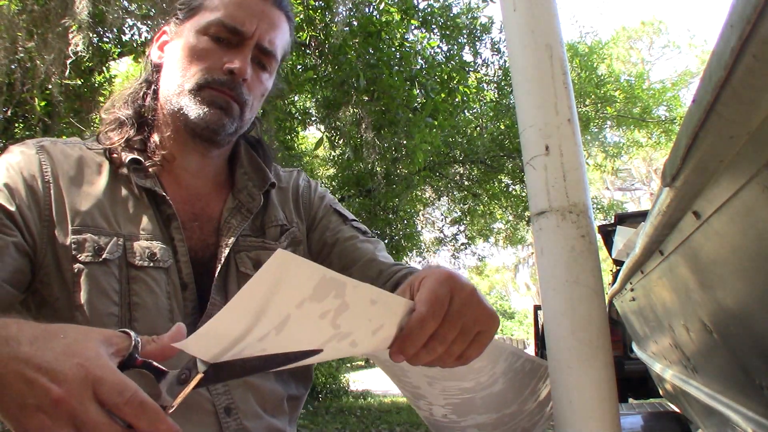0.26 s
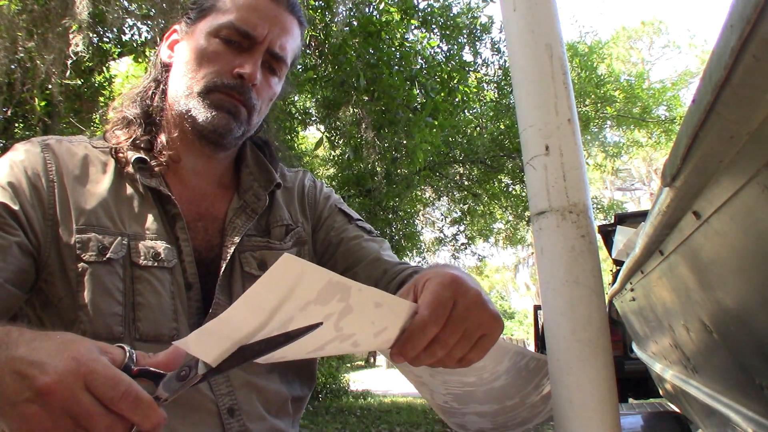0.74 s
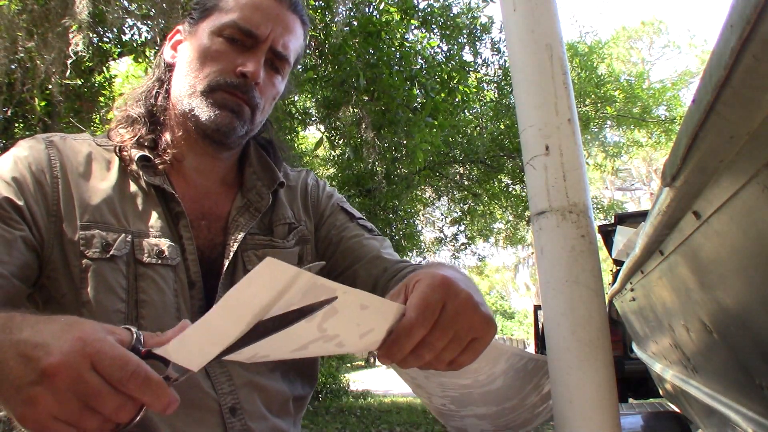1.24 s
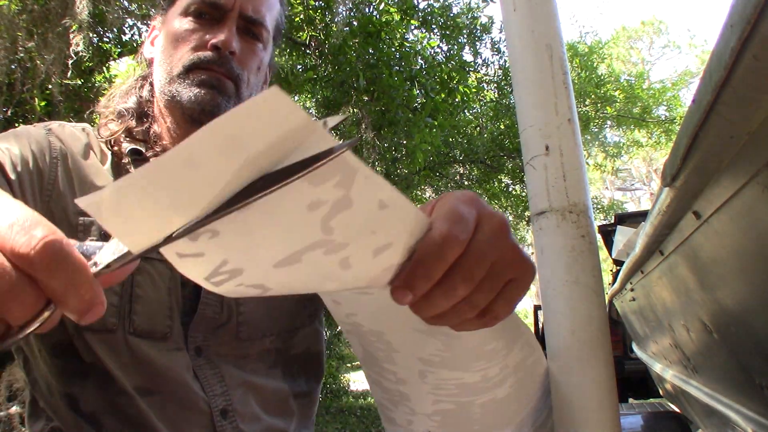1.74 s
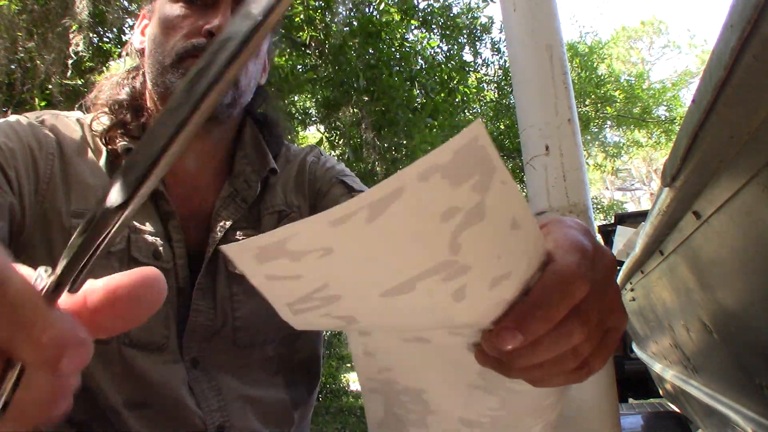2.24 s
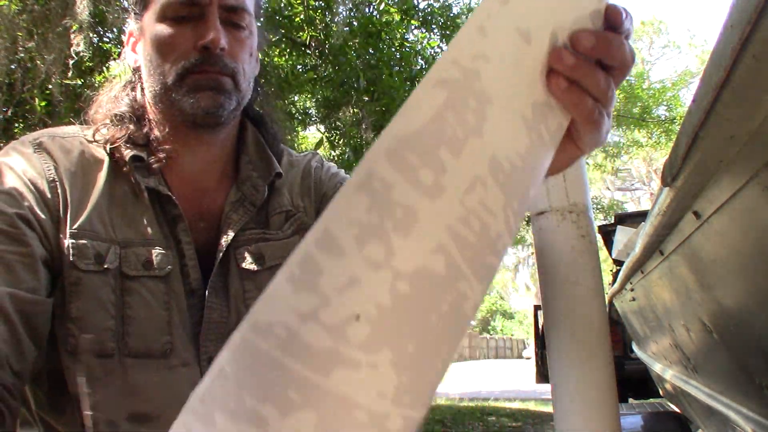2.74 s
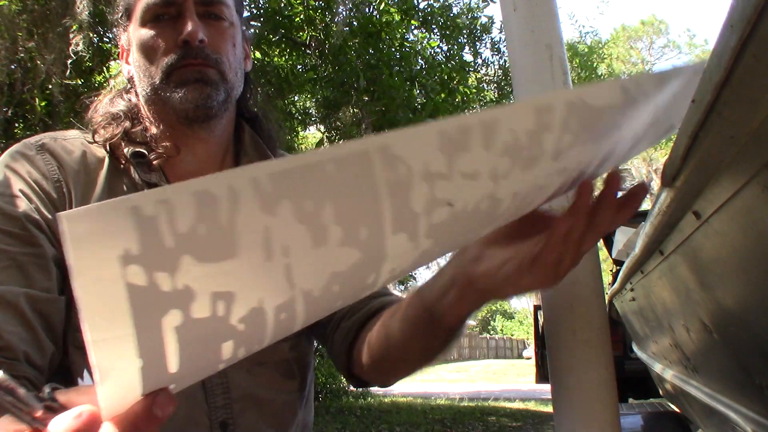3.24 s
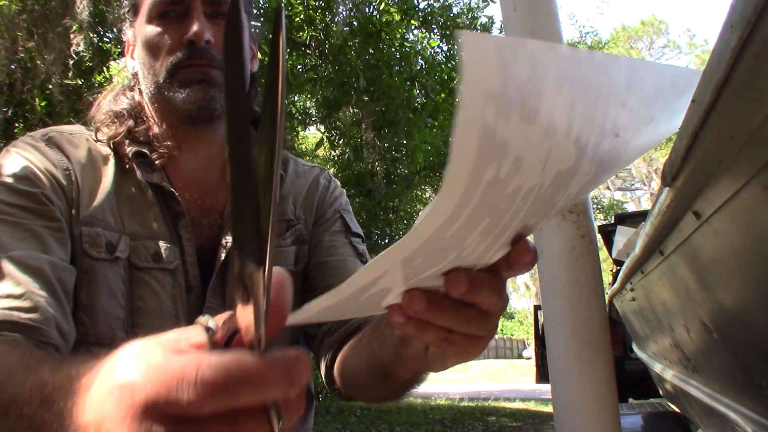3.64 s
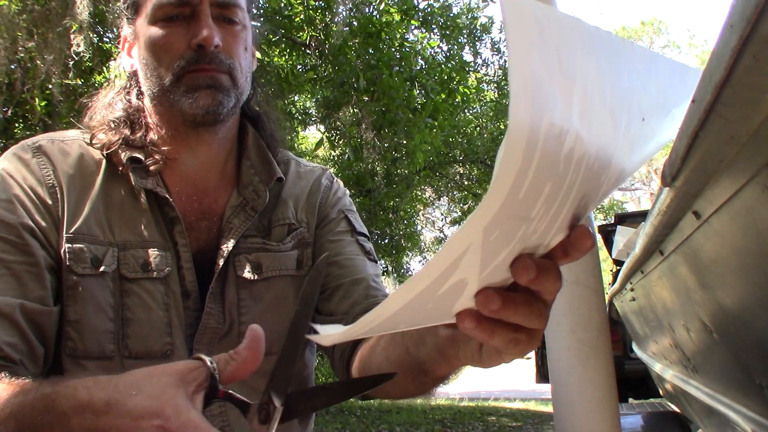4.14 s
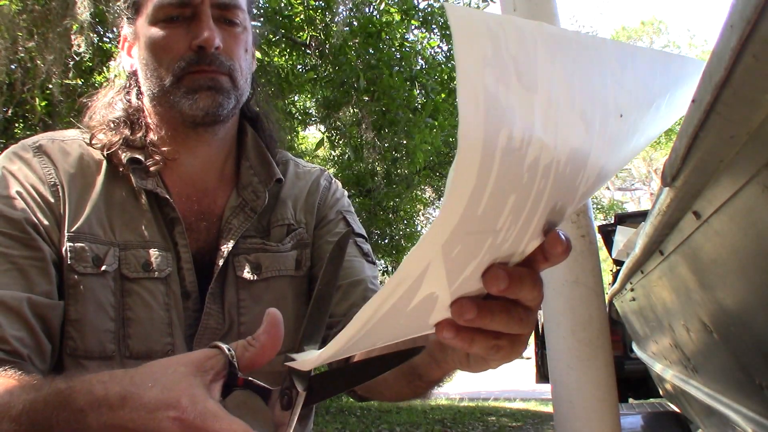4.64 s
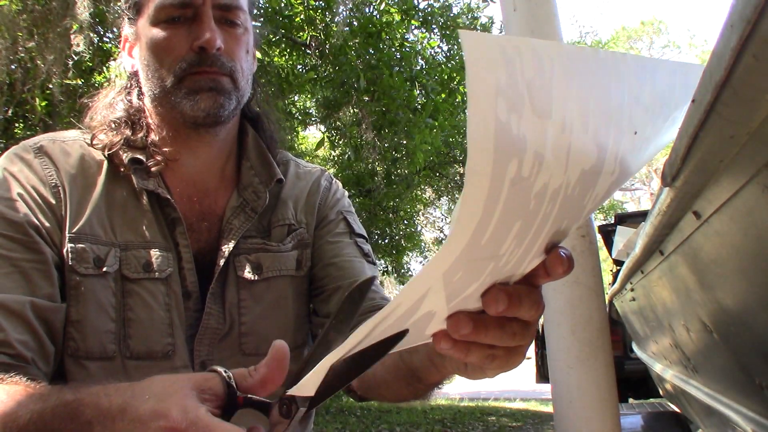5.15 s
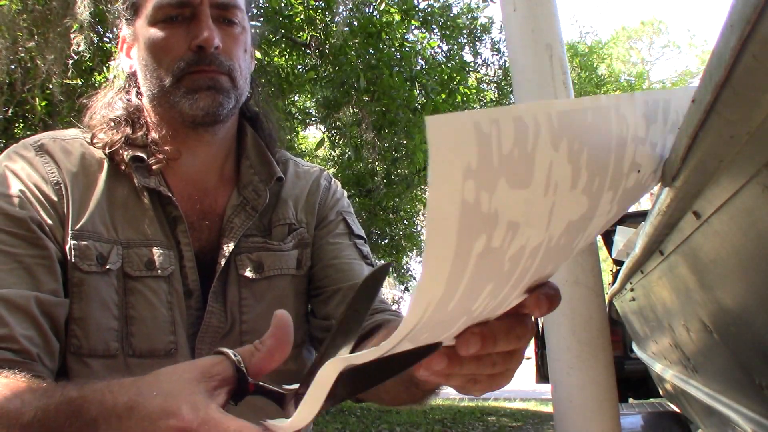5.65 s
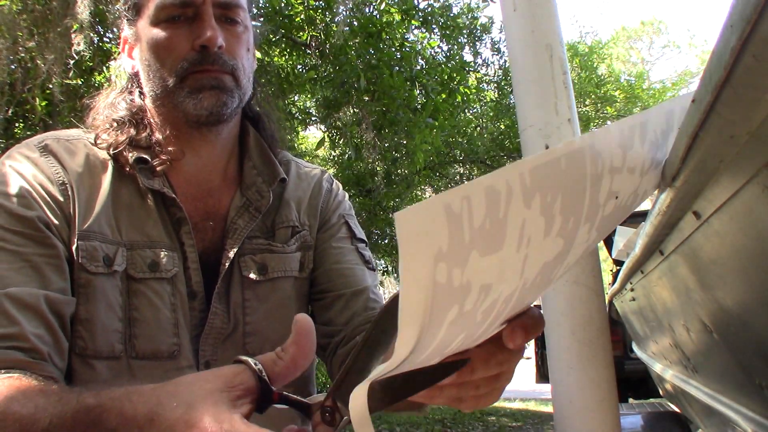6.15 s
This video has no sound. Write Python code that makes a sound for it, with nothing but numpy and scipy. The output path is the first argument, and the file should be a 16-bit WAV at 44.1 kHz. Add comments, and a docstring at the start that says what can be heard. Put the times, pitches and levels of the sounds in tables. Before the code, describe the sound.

Large shears crunch through stiff plastic in short strokes at arm's length, in the open air with faint leaf hiss and an idling diesel truck nearby. The blades clap together, then the sheet rustles, snaps and squeaks briefly under a finger. About halfway through, the truck accelerates with a growing exhaust drone and thin turbo whistle, and more cuts sound over its gear change.

```python
"""Outdoors, in rumble and leaf hiss, a turbo-diesel truck idles nearby. Close by, a stiff plastic sheet
slides and crinkles, and large shears cut it. At 2.1 s the blades clap shut, then scrape open; the sheet
is turned and a finger squeaks on it. At 3.25 s the truck pulls away: its exhaust drone climbs and the
turbo whistles up. Near 5 s the cutting starts again and the truck changes gear.
The sheet and a metal boat hull throw back short echoes throughout."""
import sys
import numpy as np
from scipy import signal
from scipy.fft import rfft, irfft
from scipy.io import wavfile
from scipy.ndimage import uniform_filter1d

SR = 44100
rng = np.random.default_rng(int(sys.argv[2]) if len(sys.argv) > 2 else 0)


def inscribe(sig):
    """Save sig as 16-bit PCM at rate SR to the path in sys.argv[1].

    A 1-D sig is mono; a 2-D sig holds one channel per row.
    Samples are clipped to [-1, 1] before scaling.
    """
    pcm = np.round(np.clip(np.atleast_2d(sig).T, -1, 1) * 32767)
    wavfile.write(sys.argv[1], SR, pcm.astype(np.int16))


N = 281799
T = np.arange(N) / SR
PULL_S, THROTTLE_RISE_S = 3.25, 0.11
SHIFT_S, SHIFT_LENGTH_S = 5.19, 0.05


def undb(db):
    """Decibels to gain."""
    return 10 ** (np.asarray(db) / 20)


def unit(x):
    """Scale to rms 1."""
    return x / np.sqrt(np.mean(x ** 2) + 1e-18)


def noise():
    """White noise, scene length."""
    return rng.standard_normal(N)


def ramp(start_s, length_s):
    """Linear rise from 0 to 1."""
    return np.clip((T - start_s) / length_s, 0, 1)


def swell(start_s, length_s):
    """Half-sine rise and fall."""
    return np.sin(np.pi * ramp(start_s, length_s))


def curves(table):
    """Interpolate each later column over the times in the first."""
    times_s, *columns = np.transpose(table)
    return [np.interp(T, times_s, column) for column in columns]


def walk(rate_hz):
    """Smooth random drift, rms 1."""
    hold = max(int(SR / rate_hz), 1)
    steps = np.repeat(rng.standard_normal(N // hold + 1), hold)[:N]
    return unit(uniform_filter1d(uniform_filter1d(steps, hold), hold))


def colour(x, points, db_scale=1):
    """Filter by a spectrum of (Hz, dB) points."""
    hz, db = np.transpose(points)
    bins_hz = np.maximum(np.fft.rfftfreq(N, 1 / SR), 1)
    return irfft(rfft(x) * undb(db_scale * np.interp(np.log(bins_hz), np.log(hz), db)), N)


def band(x, low_hz, high_hz, order=2):
    """Causal band-pass."""
    edges_hz = np.clip([low_hz, high_hz], 5, SR * .48)
    return signal.sosfilt(signal.butter(order, edges_hz, "band", fs=SR, output="sos"), x)


def resonate(x, hz, width_hz, order=1):
    """One resonance driven by x, rms 1."""
    return unit(band(x, hz - width_hz / 2, hz + width_hz / 2, order))


def ring(start_s, hz, db, t60_s):
    """One struck, damped mode."""
    t = np.maximum(T - start_s, 0)
    return np.sin(2 * np.pi * hz * t) * undb(db - np.minimum(60 * t / t60_s, 200))


def place(x, left_bias, echo_db, t60_s):
    """Stereo with short scattered echoes; the bias lifts the left and lowers the right."""
    t = T[:SR // 4]
    tails = rng.standard_normal((2, len(t))) * undb(-60 * t / t60_s) * (t > .002)
    tails /= np.sqrt(np.sum(tails ** 2, axis=1, keepdims=True))
    # Long waves pass round small things; the shortest scatter most.
    scattered = undb(echo_db) * colour(x, [(80, -4.5), (300, -2), (1000, -1.5), (4500, 0.5), (9000, 7)])
    left, right = [x + signal.fftconvolve(scattered, tail)[:N] for tail in tails]
    return np.array([colour(left, left_bias, 0.48), colour(right, left_bias, -0.7)])


# Idle tones. Each row: frequency in Hz, relative level in dB.
IDLE_TONES = [(84, -47.5), (115.5, -44.5), (123, -44.5), (175, -50), (203.6, -44.5), (232.6, -47.5),
              (247, -50), (271, -48.5)]
def idle():
    """The idling engine's hum wavers, then fades as the truck pulls off."""
    hum = sum(undb(db + 2 * walk(4.78)) * np.sin(2 * np.pi * hz * T + walk(5.03))
              for hz, db in IDLE_TONES)
    return undb(1) * hum * np.interp(T, [PULL_S, 3.6], [1, 0])


# Outdoor rumble spectrum. Each row: frequency in Hz, relative level in dB.
AIR_SPECTRUM = [(15, -34), (25, -5), (91, -4.5), (122, -2.5), (152, -3.5), (204, -4), (313, -10.5),
                (340, -14), (445, -17), (509, -16.5), (804, -22), (1450, -27.5), (2230, -26), (4500, -39),
                (15500, -53.5)]
# Leftward bias of rumble and idle. Each row: frequency in Hz, bias in dB before scaling.
AIR_BIAS = [(40, 5.3), (110, 9), (700, 2.7), (2400, 5.6), (8000, 4.3)]
def background():
    """Outdoor rumble and engine idle to the left, leaf hiss from all round."""
    rumble = unit(colour(noise(), AIR_SPECTRUM)) * undb(-39.5 + 1.08 * walk(6.42))
    leaf_spectrum = [(200, 7), (600, 0.5), (3000, -6), (8000, -13), (15000, -12.5)]
    leaves = np.array([unit(colour(noise(), leaf_spectrum)) for _ in range(2)])
    return place(rumble + idle(), AIR_BIAS, echo_db=-8.5, t60_s=0.31) + undb(-52) * leaves


def crank_speed(idle_hz=16.5, surge_hz=11.7, surge_s=0.29, climb_hz_per_s=2.85, shift_ratio=0.622):
    """Turns a second: idle, a surge, a steady climb, a drop at the gear change."""
    t = np.maximum(T - PULL_S, 0)
    low_gear_hz = idle_hz + surge_hz * (1 - np.exp(-t / surge_s)) + climb_hz_per_s * t
    return low_gear_hz * (1 - (1 - shift_ratio) * ramp(SHIFT_S, SHIFT_LENGTH_S))


# Engine noise envelope. Each row: time in seconds, relative level in dB.
ROAR_LEVELS = [(3.15, -46), (3.38, -37.5), (3.58, -36), (3.85, -36), (4.6, -34.5), (5.6, -31.5),
               (6.15, -31.5), (6.39, -34)]
# Engine noise spectrum. Each row: frequency in Hz, relative level in dB.
ROAR_SPECTRUM = [(240, -11), (400, -8), (550, -1), (780, -5.5), (1100, -2.5), (1650, 0), (2000, -4),
                 (2900, -7), (3500, -8.5), (4300, -7.5), (6900, -15.5), (8600, -23.5), (11000, -35.5),
                 (15500, -51)]
# Engine bay resonances. Each row: centre in Hz, width in Hz, relative level in dB.
BAY_MODES = [(810, 69, -10.5), (1740, 160, -21)]
def roar(turns, dulling_db_per_s=0.93):
    """Fan, intake and combustion noise pulses with the firings and rings the engine bay."""
    pulsing = 1 + .3 * np.cos(2 * np.pi * 3 * turns) + .15 * np.cos(2 * np.pi * turns)
    rush = unit(colour(noise() * pulsing, ROAR_SPECTRUM))
    treble = band(rush, 2500, 18000, order=1) * ramp(PULL_S, THROTTLE_RISE_S)
    treble_db = 2 - dulling_db_per_s * np.maximum(T - PULL_S, 0)  # dulls as the truck draws off
    bay = sum(undb(db + 1.3 * walk(4.7)) * resonate(noise() * pulsing, hz, width_hz)
              for hz, width_hz, db in BAY_MODES)
    level_db = curves(ROAR_LEVELS)[0] - 3.5 + .5 * walk(24.91)
    return undb(level_db) * (rush + (undb(treble_db) - 1) * treble + bay)


# Spectrum of the scraped sheet. Each row: frequency in Hz, relative level in dB.
SHEET_SPECTRUM = [(120, -22), (300, 2.5), (600, 2), (1200, 8), (1750, -4), (2300, -2), (3300, -2.5),
                  (4100, -1), (5500, 0.5), (8200, -2.5), (9400, -11), (12500, -13), (15500, -26.5)]
def scrape(strokes, slips_per_s, spread_db, hiss_db, edge_db, body_db, top_db):
    """Tiny slips and fractures shake the sheet; each stroke swells to a peak and dies away."""
    slips = (rng.random(N) < slips_per_s / SR) * rng.choice([-1, 1], N)
    slips = slips * undb(spread_db * np.minimum(rng.exponential(size=N), 4))
    sheet = colour(unit(slips) + undb(hiss_db) * noise(), SHEET_SPECTRUM)
    bands_hz = [(200, 1500), (1500, 3700), (3700, 11000), (11000, 17000)]
    low, mid, high, top = (unit(band(sheet, *edges, order=5)) for edges in bands_hz)
    mean_db = np.mean([db for _, _, _, db, _ in strokes])
    out = np.zeros(N)
    for start_s, length_s, peak_share, db, sizzle_db in strokes:
        span = slice(int(start_s * SR), int((start_s + length_s) * SR))
        t = T[span] - start_s
        pressure_db = np.interp(t, [0, peak_share * length_s, length_s], [edge_db, 0, edge_db])
        pressure = unit(undb(pressure_db) * signal.windows.tukey(len(t), .15))
        # Harder strokes shake the body more; crisper ones gain most at the very top.
        body = undb(body_db + 0.29 * (db - mean_db)) * low[span]
        sizzle = undb(sizzle_db) * high[span] + undb(2.7 * sizzle_db + top_db) * top[span]
        out[span] += undb(db) * pressure * (mid[span] + body + sizzle)
    return out


# Slides of the sheet. Each row: start in seconds, length in seconds, peak position as a share of
# the length, relative level in dB, sizzle in dB.
SLIDE_STROKES = [(0.157, 0.082, .55, -49, -17), (1.74, 0.22, .15, -49, -15), (2.31, 0.39, 0.25, -46, -9),
                 (2.508, 0.017, 0.31, -36.5, -1.5), (2.532, .009, .33, -34, 2),
                 (2.548, .03, 0.62, -48.5, 8), (2.625, 0.028, .22, -44, 7.5),
                 (2.652, 0.066, 0.58, -41, -4.5), (2.717, 0.02, .58, -31.5, -3.5),
                 (2.767, 0.13, .4, -46, -10), (3.124, 0.065, 0.7, -41, -5.5),
                 (3.276, 0.087, 0.84, -43, 1.5), (3.355, .065, .3, -37, 4), (3.413, 0.098, 0.22, -36.5, 2)]
def slides():
    """The sheet slides over hands and clothes in dense, uneven slips."""
    return undb(-2.5) * scrape(SLIDE_STROKES, slips_per_s=2600, spread_db=6, hiss_db=0,
                               edge_db=-11.5, body_db=-5.5, top_db=-25.5)


def crinkles(strokes, boost_db=9, spread_db=3.5, centre_hz=1700, treble_db=-24):
    """Snap rows: the sheet crinkles once at a random moment of each stroke."""
    rows = []
    for start_s, length_s, _, stroke_db, _ in strokes:
        at_s = start_s + length_s * rng.random()
        db = stroke_db + boost_db + spread_db * rng.standard_normal()
        hz = centre_hz * 2 ** (rng.random() - .5)
        rows.append((at_s, db, hz, treble_db))
    return rows


# Sheet snaps and blade knocks. Each row: start in seconds, relative peak in dB, pitch in Hz,
# treble in dB.
SNAP_HITS = [(0.3635, -29.5, 2500, -2.5), (1.2513, -14.5, 1700, -12), (1.998, -16, 780, -21),
             (2.036, -6.5, 1700, -20), (2.072, -10.5, 1200, -25), (2.093, -8.5, 870, -9),
             (2.101, -20, 2300, 7), (2.155, -14.5, 1520, -6), (2.4857, -16.5, 1590, -30),
             (2.515, -15, 1500, -6), (2.534, -17, 10100, -6.5), (2.7695, -13.5, 1050, -15),
             (3.153, -20, 2000, -11), (3.171, -16.5, 1700, -18), (3.3415, -17, 1500, -7),
             (3.357, -14, 1000, -16), (3.368, -11.5, 1000, -15), (3.423, -13, 880, -0.5),
             (3.458, -10.5, 1360, -13), (3.529, -12, 1310, -6.5), (3.598, -17.5, 1300, -4),
             (6.036, -16.5, 3500, -11)]
def snaps(crack_t60_s=0.017, rattle_t60_s=0.062, rattle_db=-25):
    """Each snap, knock or crinkle is a sharp kick of the sheet, a brief rattle and a bright crack."""
    out, t = np.zeros(N), T[:SR // 10]
    for start_s, db, hz, treble_db in SNAP_HITS + crinkles(CUT_STROKES + SLIDE_STROKES):
        rattle = undb(rattle_db - 60 * t / rattle_t60_s) * rng.standard_normal(len(t))
        kick = band((t == 0) + rattle, hz * 0.4, hz * 1.46)
        crack = band(rng.standard_normal(len(t)) * undb(-60 * t / crack_t60_s), 3540, 7260)
        snap = kick / np.abs(kick).max() + undb(treble_db - 1) * crack
        i = int(start_s * SR)
        out[i:i + len(t)] += undb(db - 1.5) * snap[:N - i]
    return out


# Strokes of the shears. Each row: start in seconds, length in seconds, peak position as a share of
# the length, relative level in dB, sizzle in dB.
CUT_STROKES = [(0.44, 0.28, 0.4, -46.5, -5.5), (0.66, 0.21, .37, -53, -3), (0.84, 0.16, .4, -40, -6.5),
               (1.045, 0.13, 0.5, -39.5, -5.5), (1.382, 0.028, .3, -40.5, -8), (1.419, 0.082, .1, -44, -4),
               (1.98, .06, 0.84, -32.5, -7), (2.034, .061, 0.11, -28, -10), (2.089, .02, 0.51, -27, 0),
               (5.06, 0.17, 0.48, -43, -1), (5.21, 0.13, 0.58, -35, -5.5), (5.42, .1, 0.44, -47, -1.5),
               (5.745, 0.14, 0.31, -37.5, -0.5), (5.99, 0.083, .55, -37.5, -2),
               (6.23, 0.098, 0.37, -37.5, 0.5)]
def cuts():
    """The shears part the sheet in runs of tiny fractures."""
    return undb(-1) * scrape(CUT_STROKES, slips_per_s=1400, spread_db=3, hiss_db=-4,
                             edge_db=-9.5, body_db=-5, top_db=-11)


# Sheet bending modes. Each row: start in seconds, frequency in Hz, level in dB, T60 in seconds.
FLAP_MODES = [(1.252, 600, -22.5, 0.027), (1.251, 342, -34, 0.066), (2.092, 245, -16, 0.045),
              (2.097, 500, -20, 0.029), (2.544, 193, -21, 0.071), (2.546, 487, -29.5, .08),
              (2.548, 606, -33.5, 0.096), (2.564, 140, -18.5, 0.073)]
def flaps():
    """The whole sheet flexes and rings low and briefly."""
    return sum(ring(*mode) for mode in FLAP_MODES)


# Struck blade modes. Each row: frequency in Hz, relative level in dB, T60 in seconds.
SHUT_MODES = [(1200, -15, 0.1), (1430, -19, .16), (2160, -11, .05), (2680, 17, 0.021), (3440, -12, .085),
              (4064, -11, .08), (7500, -10, .07), (8350, -1, .035), (9900, 2, 0.044), (10180, -2, 0.04)]
def blades_shut(start_s=2.099):
    """The blades clap together and ring."""
    return undb(-32) * sum(ring(start_s, *mode) for mode in SHUT_MODES)


# Rubbed blade resonances. Each row: centre in Hz, width in Hz, relative level in dB.
RUB_MODES = [(3200, 280, 3.5), (3760, 220, 1), (5420, 240, 0), (8150, 300, -6), (9300, 400, -9.5)]
def blades_open(start_s=2.276, attack_s=0.016, t60_s=0.22):
    """Blade rubs on blade, hissing and exciting narrow resonances."""
    modes = sum(undb(db) * resonate(noise(), hz, width_hz) for hz, width_hz, db in RUB_MODES)
    hiss = undb(-3) * unit(band(noise(), 3500, 10000))
    level_db = -42 - 60 * ramp(start_s + attack_s, t60_s)
    return ramp(start_s, attack_s) * undb(level_db) * (modes + hiss)


def squeak(start_s=2.715, length_s=0.02, from_hz=1100, to_hz=3795):
    """A finger sticks and slips on the sheet at a rough, quickly rising rate."""
    glide_hz = from_hz + (to_hz - from_hz) * ramp(start_s, length_s)
    slip_hz = glide_hz * (1 + 0.12 * walk(1500))
    slipping = np.sin(2 * np.pi * np.cumsum(slip_hz) / SR) * (1 + 0.49 * walk(900))
    return undb(-22.5) * swell(start_s, length_s) * slipping


def order_tone(turns, order, waver_rad):
    """A wavering tone at a multiple of crank speed, rms 1."""
    phase = 2 * np.pi * (order * turns + rng.random())
    return np.sqrt(2) * np.sin(phase + waver_rad * walk(14))


# Engine load. Each row: time in seconds, gain in dB.
ENGINE_LOAD = [(3.3, -11.5), (3.65, -1.5), (3.78, -4.5), (4.1, -0.5), (4.95, 0), (5.25, -7.5), (5.6, -5.5),
               (5.95, -17), (6.3, -5)]
# Firing tones. Each row: cycles per crank turn, relative level in dB.
FIRING_ORDERS = [(3, -1), (4, -12.5), (6, 1), (9, -4.5)]
# Weak tones from unequal cylinders. Each row: cycles per crank turn, relative level in dB.
WEAK_ORDERS = [(5, -14), (7, -14.5), (8, -17.5), (10, -21.5), (11, -25.5)]
# Narrow exhaust resonances. Each row: centre in Hz, width in Hz, gain in dB.
DRONE_MODES = [(92.04, 6.6, -22), (101, 4.3, -34.5), (131.9, 12, -21), (160.7, 7.2, -24), (174.2, 13, -31),
               (194.55, 13, -22.5), (226, 17, -28), (297.5, 14, -28.5)]
# Broad exhaust resonances. Each row: centre in Hz, width in Hz, relative level in dB.
RUMBLE_MODES = [(163, 90, -6), (245, 70, -13.5), (328.6, 75, -16.5)]
def exhaust(crank_hz, turns, shift_fade_s=0.051):
    """Firing tones swell and fade as they climb through the pipe's resonances; uneven firings rumble."""
    firing = np.zeros(N)
    for order, db in FIRING_ORDERS:
        pipe_gain = sum(undb(peak_db) / (1 + (2 * (order * crank_hz - hz) / width_hz) ** 2)
                        for hz, width_hz, peak_db in DRONE_MODES)
        firing += undb(db) * pipe_gain * order_tone(turns, order, waver_rad=0.095)
    weak = sum(undb(db + 2.73 * walk(8.9)) * order_tone(turns, order, waver_rad=0.3)
               for order, db in WEAK_ORDERS)
    rumble = sum(undb(db) * resonate(noise(), hz, width_hz, order=3) for hz, width_hz, db in RUMBLE_MODES)
    # The tones drop out during the gear change.
    from_shift_s = np.abs(T - SHIFT_S - SHIFT_LENGTH_S / 2) - SHIFT_LENGTH_S / 2
    in_gear = np.clip(from_shift_s / shift_fade_s, 0, 1) ** .5
    lug_db = 4.5 * (1 - ramp(3.69, 0.31))  # the engine shakes most while picking up speed
    load_db = curves(ENGINE_LOAD)[0]
    drone = undb(load_db + 0.97 * walk(24.88)) * in_gear * firing
    uneven = undb(-27) * in_gear * weak + undb(-27.5 + lug_db) * rumble
    return ramp(PULL_S, THROTTLE_RISE_S) * (drone + undb(0.16 * load_db) * uneven)


def clutch(length_s=0.5):
    """A deep shudder as the clutch takes hold."""
    return undb(-38.5) * swell(PULL_S, length_s) * unit(band(noise(), 50.3, 82, order=4))


def whistle(hz, width_hz):
    """An airy tone smeared by turbulence."""
    phase = 2 * np.pi * np.cumsum(hz * np.ones(N)) / SR
    sine_gain, cosine_gain = (unit(band(noise(), 5, width_hz / 2)) for _ in range(2))
    return sine_gain * np.sin(phase) + cosine_gain * np.cos(phase)


# Intake whirrs. Each row: peak time in seconds, length in seconds, pitch in Hz, level in dB.
INTAKE_WHIRRS = [(4.045, 1.06, 2335, -44), (5.098, 3.6, 2917, -46), (5.45, 0.4, 5320, -48)]
# Turbo spool-up. Each row: time in seconds, pitch in Hz, relative level in dB.
TURBO_GLIDE = [(3.4, 4140, -64), (3.9, 4220, -41.5), (4.1, 4380, -46), (4.5, 5590, -51.5), (4.8, 7010, -63),
               (5.15, 7800, -53), (5.7, 9270, -53.5), (6.39, 10500, -71)]
def intake():
    """Intake whirrs swell and fade; above them the turbo whistles up as it spools."""
    whirrs = sum(undb(db) * swell(peak_s - length_s / 2, length_s) * whistle(hz, width_hz=370)
                 for peak_s, length_s, hz, db in INTAKE_WHIRRS)
    turbo_hz, turbo_db = curves(TURBO_GLIDE)
    onset = ramp(TURBO_GLIDE[0][0], .1)
    return whirrs + undb(turbo_db - 0.5) * onset * whistle(turbo_hz, width_hz=660)


# Leftward bias of handwork and truck. Each row: frequency in Hz, bias in dB before scaling.
HANDWORK_BIAS = [(100, 6), (700, 10), (2400, 6), (4400, 4.5), (8000, 1.5), (15000, 5)]
TRUCK_BIAS = [(80, 9.4), (200, 6.7), (400, 11.2), (1300, 7.4), (4400, 2.7), (15000, 1.6)]
def scene():
    """Handwork at arm's length, the truck further off, open air around."""
    crank_hz = crank_speed()
    turns = np.cumsum(crank_hz) / SR
    truck = roar(turns) + exhaust(crank_hz, turns) + clutch() + intake()
    handwork = slides() + snaps() + cuts() + flaps() + blades_shut() + blades_open() + squeak()
    near = place(handwork, HANDWORK_BIAS, echo_db=-13.5, t60_s=0.07)
    far = place(truck, TRUCK_BIAS, echo_db=-5.5, t60_s=0.18)
    return background() + near + far


def record(dry, cutoff_hz=15850):
    """A steep low-pass cuts the top."""
    return signal.sosfilt(signal.ellip(10, .2, 80, cutoff_hz, fs=SR, output="sos"), dry)


dry = scene()
out = record(dry)
inscribe(out)
```